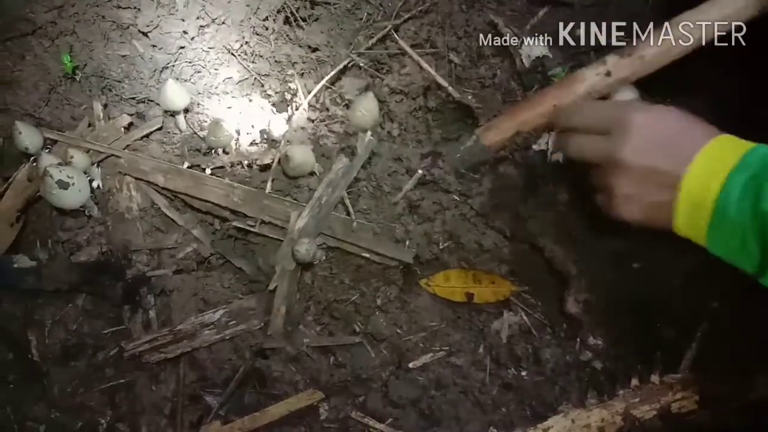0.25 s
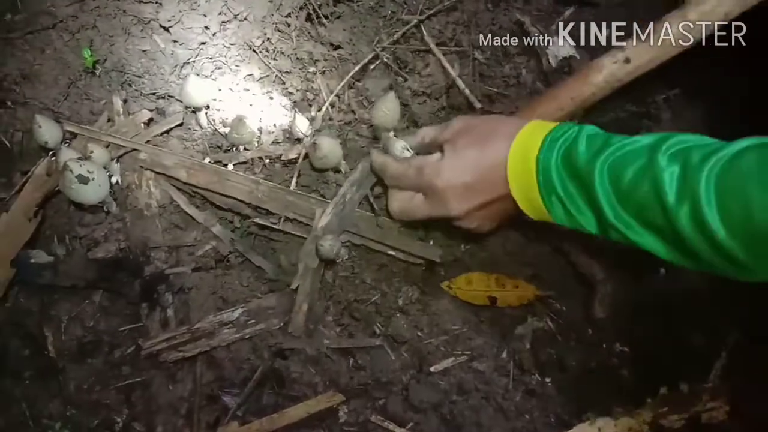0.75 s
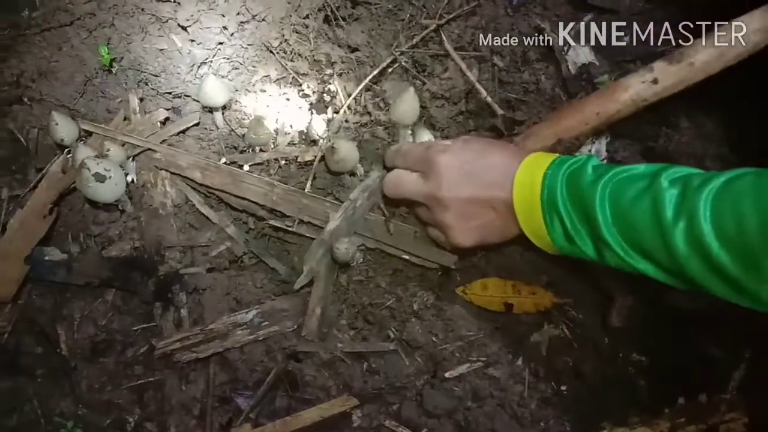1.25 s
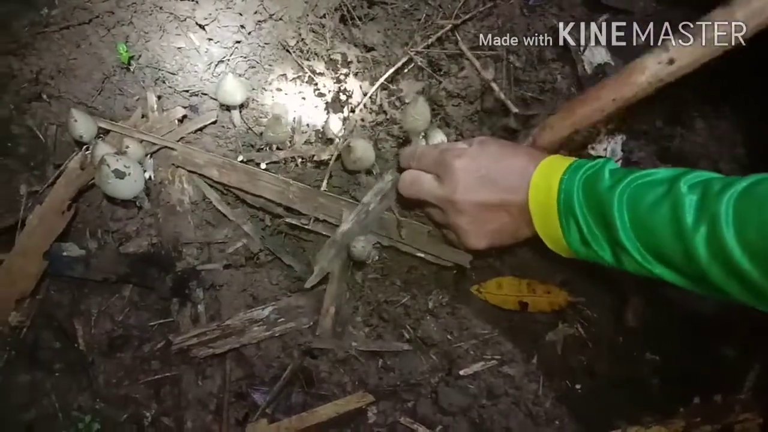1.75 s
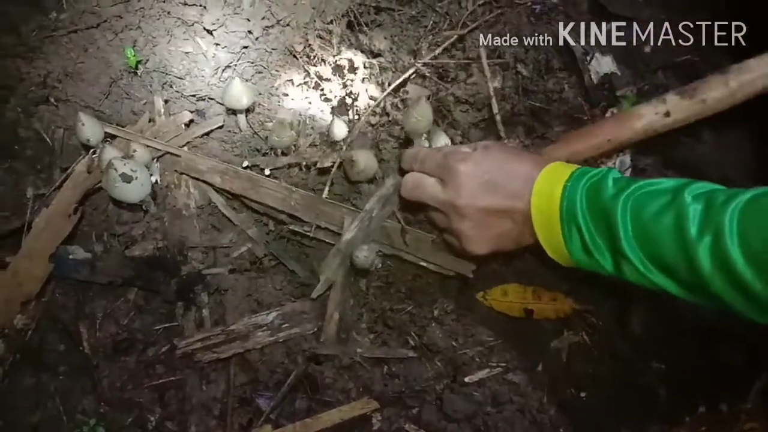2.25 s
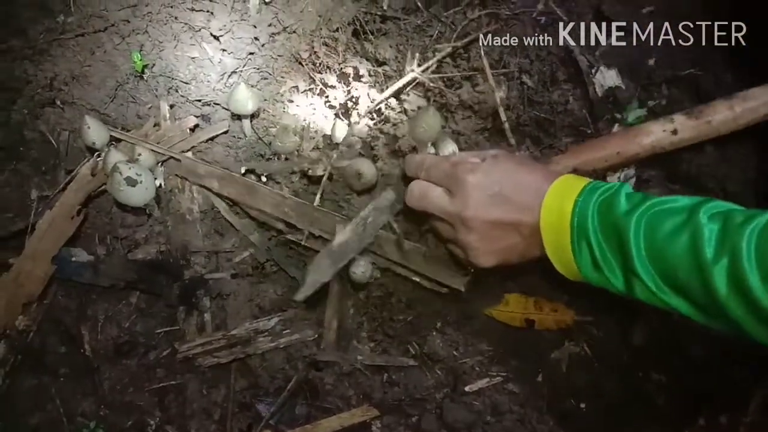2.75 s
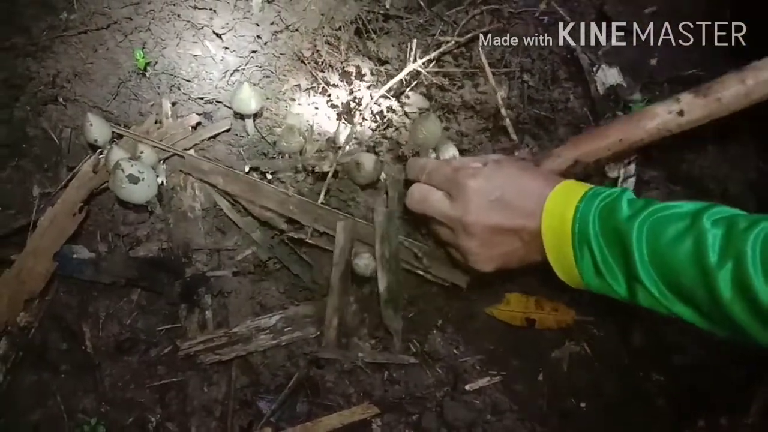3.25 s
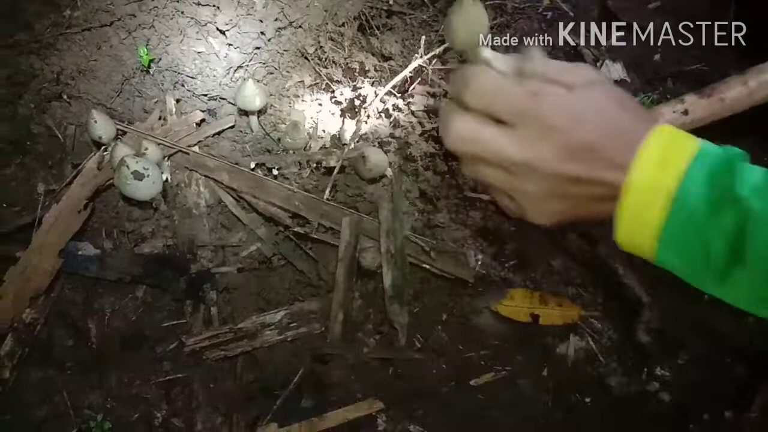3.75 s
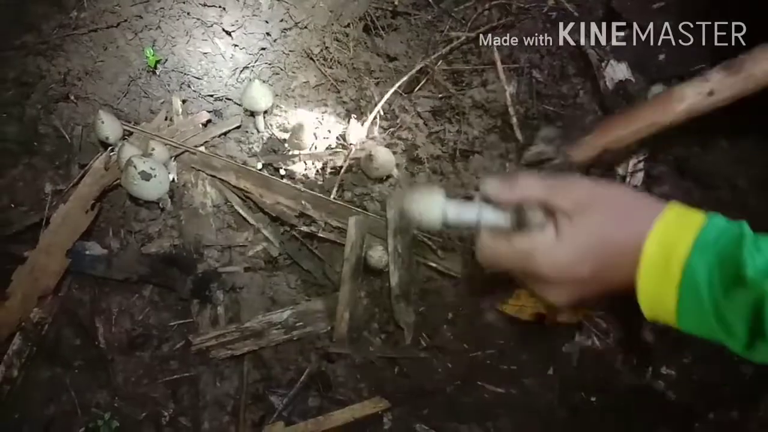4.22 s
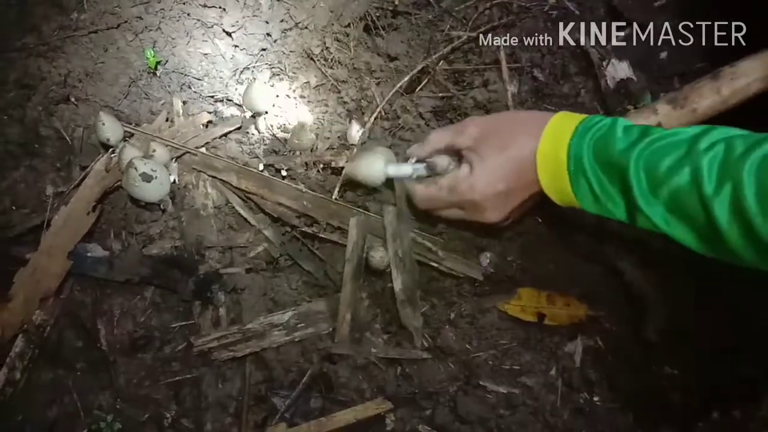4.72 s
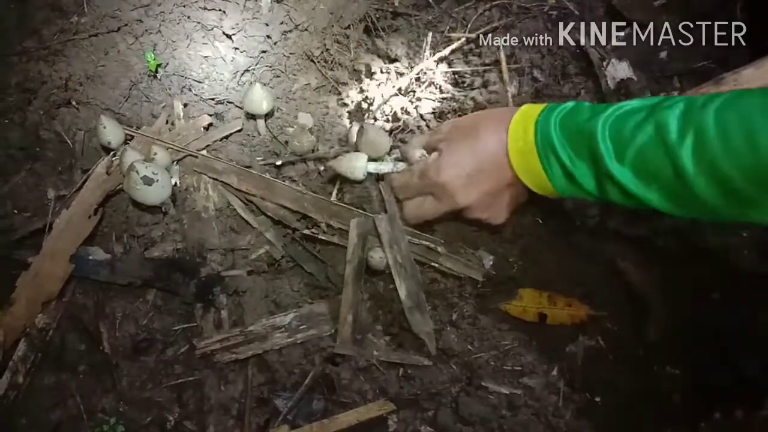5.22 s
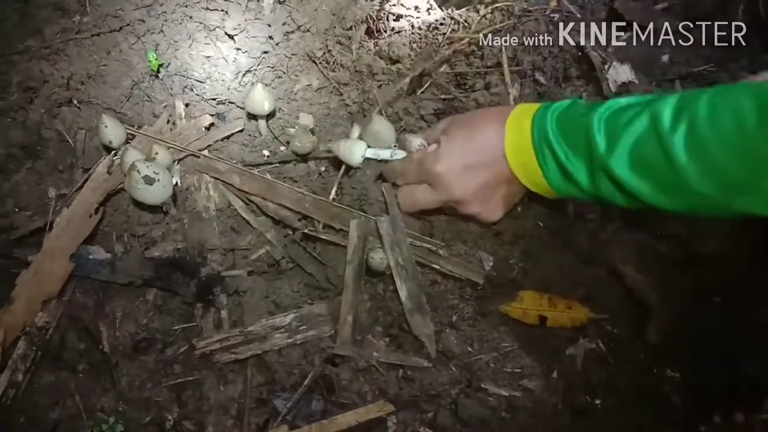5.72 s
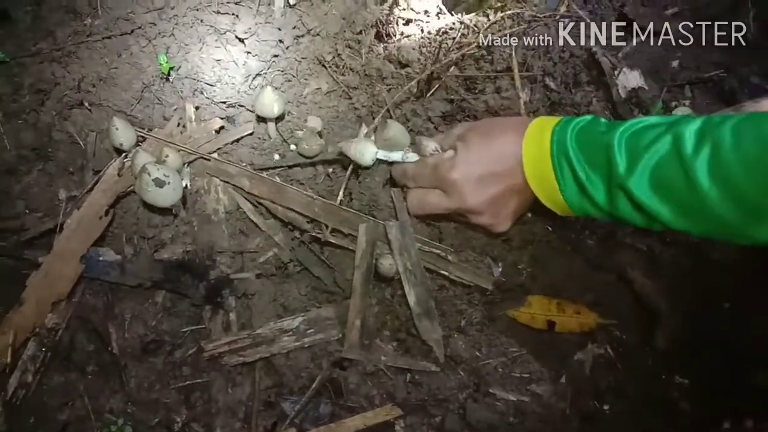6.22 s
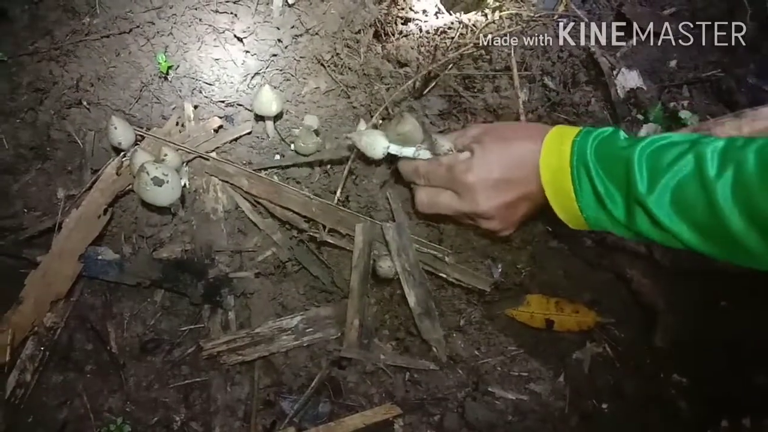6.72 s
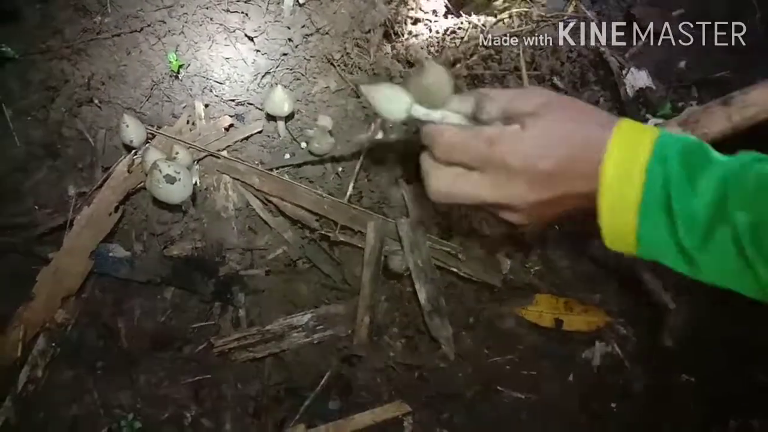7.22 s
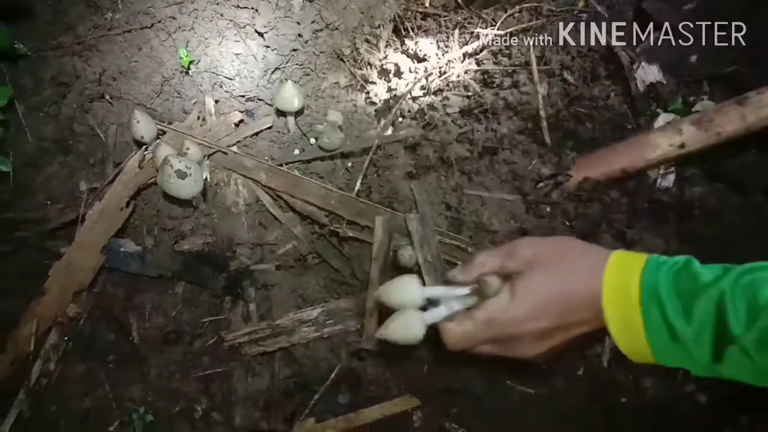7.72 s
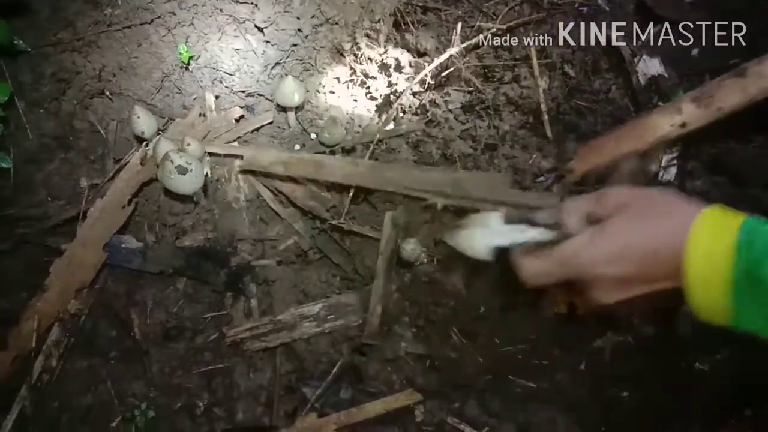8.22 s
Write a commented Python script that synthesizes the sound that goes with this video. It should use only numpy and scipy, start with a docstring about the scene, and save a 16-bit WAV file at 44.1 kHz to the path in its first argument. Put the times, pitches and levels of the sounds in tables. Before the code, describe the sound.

Sharp twig cracks and small woody clicks break over a steady, high-pitched chorus of crickets on a quiet forest floor at night.

```python
"""Crickets and a foraging hand

Night on a forest floor: crickets chirp and trill, near and far, while a hand picks mushrooms close by.
Each wing stroke is a short, falling tone that the trees smear into a chorus.
Twigs snap, sticks knock together and dry litter crackles: sharp pushes and tiny cracks set off resonances.
Filtered noise makes a faint low rumble and hiss underneath."""
import sys
import numpy as np
from scipy import signal
from scipy.fft import rfft, irfft, next_fast_len
from scipy.io import wavfile

SR = 44100
rng = np.random.default_rng(int(sys.argv[2]) if len(sys.argv) > 2 else 0)


def master(y):
    """Save y as 16-bit WAV."""
    cut = np.clip(np.atleast_2d(y).T, -1, 1)
    pcm = np.round(cut * 32767)  # scale
    wavfile.write(sys.argv[1], SR, pcm.astype(np.int16))


N = 373527
T = np.arange(N) / SR


def undb(db):
    """Turn decibels into gain."""
    return 10 ** (np.asarray(db) / 20)


def unit(x):
    """Scale to an rms of 1."""
    return x / np.sqrt(np.mean(x ** 2) + 1e-24)


def peak(x, db):
    """Scale so that the highest peak lies at db."""
    return x * undb(db) / np.abs(x).max()


def add(out, s, x):
    """Mix x into out from time s on."""
    i = max(int(s * SR), 0)
    x = x[:max(N - i, 0)]
    out[i:i + len(x)] += x


def ring(x, hz, width):
    """One resonance, with a gain of 1 at its centre."""
    centre = min(hz, .45 * SR)
    sharpness = hz / min(width, .4 * SR)
    b, a = signal.iirpeak(centre, sharpness, fs=SR)
    return signal.lfilter(b, a, x)


def band(x, hz, width):
    """The same resonance applied twice, for steeper sides."""
    return ring(ring(x, hz, width), hz, width)


def walk(rate):
    """Random drift with a spread near 1: straight lines between random points, rate of them a second."""
    knots = rng.standard_normal(int(N / SR * rate) + 2)
    return np.interp(T * rate, np.arange(len(knots)), knots)


def grains(per_s, spread_db):
    """A run of tiny cracks of uneven size at random times."""
    sizes = rng.standard_normal(N) * undb(spread_db * np.minimum(rng.exponential(size=N), 3))
    return (rng.random(N) < per_s / SR) * sizes


FOREST_T60_S = 0.86  # time the echo takes to fall by 60 dB; it is cut off after half a second


def forest(x, wet_db):
    """Direct sound plus a tail scattered by trunks and leaves, at about the same total power."""
    t = T[:SR // 2]
    tail = rng.standard_normal(len(t)) * np.exp(-np.log(1000) * t / FOREST_T60_S)
    # a mirrored piece goes in front, so the echo is already under way at time 0
    led_in = np.r_[x[:len(t)][::-1], x]
    echo = signal.fftconvolve(led_in, tail / np.linalg.norm(tail))[len(t):len(t) + N]
    return (x + undb(wet_db) * echo) / np.hypot(1, undb(wet_db))


def stroke(u):
    """Loudness along one wing stroke, u from 0 to 1: it rises and falls like half a sine."""
    return np.abs(np.sin(np.pi * np.clip(u, 0, 1)))


def chirp_times(bouts, pace_s):
    """Rows (time [s], level [dB]): chirps evenly spaced from the first to the last of each bout."""
    rows = []
    for first, last, db in bouts:
        count = round((last - first) / pace_s) + 1
        rows += [(s, db) for s in np.linspace(first, last, count)]
    return rows


def sing(bouts, pace_s):
    """Rows (time [s], level [dB]): no chirp is quite on time, or quite as loud as the one before."""
    even = np.array(chirp_times(bouts, pace_s))
    jitter_s, scatter_db = .0015, 1.23
    return even + rng.standard_normal(even.shape) * [jitter_s, scatter_db]


def chirps(table, hz, fall_hz, period_s, stroke_s, first_db, count, scatter=0.0043):
    """Groups of wing strokes; the scraper slows along the file, so each tone falls."""
    out = np.zeros(N)
    u = T[:int(stroke_s * SR)] / stroke_s
    for (s, db), chance in zip(table, rng.standard_normal((len(table), count, 3))):
        for k, (detune, size, phase) in enumerate(chance):
            pitch = hz * (1 + scatter * detune) + fall_hz * (.5 - u)
            tone = np.sin(2 * np.pi * (np.cumsum(pitch) / SR + phase))
            # first_db sets the opening stroke apart from the rest
            level_db = db + size + first_db * (k == 0)
            add(out, s + k * period_s, undb(level_db) * stroke(u) * tone)
    return out


def trill(hz, rate, fall_hz, duty, waver, slip):
    """An unbroken run of falling wing strokes, rms 1; each stroke has its own size and slips in phase."""
    strokes = np.cumsum(rate * (1 + .035 * walk(6))) / SR + rng.random()
    size, phase = rng.standard_normal((2048, 2))[strokes.astype(int) % 2048].T
    # the stroke fills the share "duty" of its turn, then the wing is silent
    u = strokes % 1 / np.clip(duty, .1, 1)
    pitch = hz * (1 + waver * walk(30)) + fall_hz * (.5 - np.minimum(u, 1))
    tone = np.sin(2 * np.pi * (np.cumsum(pitch) / SR + slip * phase))
    return unit(stroke(u) * undb(2.64 * size) * tone)


# bouts of the nearest cricket: (first chirp [s], last chirp [s], relative level [dB])
NEAR_BOUTS = [(.042, .503, -46.5), (.75, 1.472, -46), (1.753, 2.44, -47.5), (2.695, 3.157, -45),
              (3.405, 4.398, -47), (4.637, 7.067, -49)]


def near_cricket():
    """Short chirps of four falling strokes, with little echo because the cricket is close."""
    song = chirps(sing(NEAR_BOUTS, pace_s=.24), hz=4390, fall_hz=430,
                  period_s=.025, stroke_s=.017, first_db=-3, count=4)
    return undb(4.0) * forest(song, wet_db=-9)


# bouts of its neighbour: (first chirp [s], last chirp [s], relative level [dB])
NEIGHBOUR_BOUTS = [(.025, 1.015, -56.5), (1.252, 1.765, -52.5), (2.245, 2.758, -51.5),
                   (2.975, 4.657, -51.5), (5.125, 5.625, -51), (5.905, 6.652, -50.5), (6.885, 8.395, -54)]
NEIGHBOUR_PACE_S = .25  # usual time from chirp to chirp


def neighbour_cricket():
    """A second cricket, a little lower in pitch and with more echo, chirps in fives."""
    song = chirps(sing(NEIGHBOUR_BOUTS, NEIGHBOUR_PACE_S), hz=4230, fall_hz=323,
                  period_s=.024, stroke_s=0.01584, first_db=-5, count=5)
    return undb(4.5) * forest(song, wet_db=-7)


def followers(lag_s=0.041, spread_s=0.068):
    """More crickets of the same kind fall into step with the neighbour, a little behind it."""
    beat = np.zeros(N)
    for s, _ in chirp_times(NEIGHBOUR_BOUTS, NEIGHBOUR_PACE_S):
        beat += np.exp(-.5 * ((T - s - lag_s) / spread_s) ** 2)
    upper = undb(-53.0) * trill(hz=4175, rate=39, fall_hz=188.8, duty=.75, waver=0.00402, slip=0.52)
    lower = undb(-58.5) * trill(hz=4096, rate=37, fall_hz=398.5, duty=.7, waver=0.0065, slip=0.69)
    return forest((upper + lower) * beat, wet_db=-5.5)


# bouts of a cricket that joins in now and then, of a tiny high one and of a still higher one:
# (first chirp [s], last chirp [s], relative level [dB])
STRAY_BOUTS = [(1.14, 1.63, -67), (2.38, 3.45, -62.5)]
THIN_BOUTS = [(.14, .89, -65), (2.32, 3.09, -66.5), (4.41, 5.18, -66.5), (6.68, 7.45, -67)]
THINNER_BOUTS = [(.83, 1.1, -67), (1.4, 1.7, -74), (2.71, 3.19, -74.5), (3.51, 4.06, -70.5),
                 (4.9, 5.68, -70.5), (6.11, 6.43, -74), (6.8, 7.4, -70.5), (7.69, 8.24, -75.5)]
# single strokes of a tiny cricket that does not break into a chirp: (time [s], relative level [dB])
PIPS = [(3.602, -65), (3.945, -64), (4.274, -63), (4.661, -61), (5.08, -62), (6.645, -67)]


def small_crickets():
    """Thin, high chirps and single strokes, with as much echo as direct sound."""
    stray = chirps(sing(STRAY_BOUTS, pace_s=.26), hz=5350, fall_hz=240,
                   period_s=0.016, stroke_s=0.022, first_db=-10, count=5)
    thin = chirps(sing(THIN_BOUTS, pace_s=.38), hz=8150, fall_hz=100,
                  period_s=0.015, stroke_s=0.012, first_db=-0.5, count=7, scatter=.002)
    thinner = chirps(sing(THINNER_BOUTS, pace_s=.275), hz=8500, fall_hz=120,
                     period_s=0.015, stroke_s=0.01, first_db=3.0, count=7, scatter=0.0051)
    pips = chirps(PIPS, hz=8650, fall_hz=220,
                  period_s=0, stroke_s=0.0078, first_db=-1, count=1, scatter=.002)
    return undb(5.5) * forest(stray + thin + thinner + pips, wet_db=0.0)


# swells of a trill, about one a second: (start [s], relative level [dB])
SWELLS = [(-.17, -60), (.73, -57), (1.72, -56.5), (2.84, -59), (3.751, -59), (4.74, -59), (5.99, -58),
          (7.021, -57.5), (8.05, -55)]
SWELL_ATTACK_S, SWELL_HOLD_S, SWELL_RELEASE_S = 0.083, 0.23, 0.43
# each swell starts flat by this much and settles as the wings speed up
SWELL_HZ, SWELL_FLAT_HZ, SWELL_CLIMB_S = 5144, 153.8, .18


def swells():
    """Gain and pitch [Hz]: each swell rises, holds and dies away while its pitch climbs."""
    gain, age = np.zeros(N), T
    corners = np.cumsum([0, SWELL_ATTACK_S, SWELL_HOLD_S, SWELL_RELEASE_S])
    for start, db in SWELLS:
        gain = gain + undb(db) * np.interp(T - start, corners, [0, 1, 1, 0])
        age = np.where(T >= start, T - start, age)
    return gain, SWELL_HZ - SWELL_FLAT_HZ * np.exp(-age / SWELL_CLIMB_S)


# crickets that swell together:
# (pitch above the common one [Hz], strokes [per s], fall in a stroke [Hz], share [dB])
SWELL_VOICES = [(10.5, 52, 260, -2), (-55.5, 43, 420, -7.5), (50, 58, 300, -10.5)]


def swelling_trill():
    """A few trilling crickets share one swell of loudness and one climb of pitch."""
    gain, pitch = swells()
    voices = np.zeros(N)
    for above_hz, rate, fall_hz, db in SWELL_VOICES:
        voices += undb(db) * trill(pitch + above_hz, rate, fall_hz, duty=0.85, waver=.007, slip=0.46)
    return forest(gain * voices, wet_db=2.0)


# long even trills: (start [s], end [s], level [dB], pitch [Hz], strokes [per s])
LONG_TRILLS = [(1.06, 1.5, -76, 8570, 66), (1.45, 1.823, -76.5, 8560, 68), (1.22, 1.778, -64, 7020, 63),
               (2.325, 2.917, -72, 7580, 32), (2.68, 3.4, -64.5, 7010, 62), (3.29, 3.897, -69, 7580, 36),
               (4.08, 4.623, -66.5, 7020, 67), (4.353, 4.992, -67.5, 7580, 37),
               (5.466, 6.09, -67, 7580, 36)]


def high_trills():
    """High, steady runs of wing strokes that start and stop with 50 ms fades."""
    high = np.zeros(N)
    for start, end, db, hz, rate in LONG_TRILLS:
        gate = np.clip(np.minimum(T - start, end - T) / .05, 0, 1)
        high += undb(db) * gate * trill(hz, rate, fall_hz=120, duty=.9, waver=.0015, slip=.3)
    return forest(high, wet_db=-1.5)


def contact(tail_db, tail_s):
    """One sharp push followed by a brief crumbling of fibres."""
    t = T[:SR // 12]
    push = undb(tail_db) * rng.standard_normal(len(t)) * np.exp(-t / tail_s)
    push[0] += 1
    return push


# twigs snapping: (time [s], relative level of the crack [dB], relative level of the woody body [dB],
# pitch of the body [Hz], gain of the glint against the crack [dB])
SNAPS = [(0.0245, -31.5, -45.5, 3680, -8), (0.1426, -27.5, -35.5, 2480, -14), (0.187, -20, -27.5, 3720, -7),
         (.529, -36, -62, 3700, -24), (1.02, -26, -33, 3800, -5), (2.154, -36, -52, 2500, -21),
         (2.166, -28.5, -46, 3180, -19), (2.4893, -15, -28.5, 3870, -19), (2.499, -27, -41, 3500, -12),
         (2.5074, -10, -24, 3600, -9), (2.51, -16, -41, 3050, -10), (2.544, -28.5, -45, 3670, -10),
         (2.615, -24, -53, 4400, 3), (2.623, -24, -56, 3720, 7), (2.6475, -17, -37.5, 3900, -3.5),
         (2.75, -23, -42, 3640, -18), (2.989, -39, -57, 4700, -16), (3.0869, -38, -70, 3700, -21),
         (3.4377, -29.5, -44, 3880, -3), (4.0325, -51, -49.5, 3020, -20), (5.962, -42, -65, 3700, -16),
         (6.0597, -53, -51.5, 2970, -20), (7.365, -37.5, -42.5, 3250, -22), (7.646, -39, -54, 4500, -18),
         (7.669, -37, -50, 4520, -16), (7.6913, -46, -40, 4800, -24), (7.933, -33, -43, 3730, -10),
         (8.2723, -33.5, -52, 4200, -25)]


def twigs():
    """A breaking twig gives a bright crack, a glint above it, a short woody body and a dull nudge to the soil."""
    out = np.zeros(N)
    for s, crack_db, body_db, body_hz, glint_db in SNAPS:
        push = contact(tail_db=-16.5, tail_s=0.0022)
        crack = ring(band(push, 6330, 2200), 7760, 3000)
        glint = undb(glint_db) * band(push, 15100, 1440)
        body = band(push, body_hz, 0.44 * body_hz)
        nudge = undb(-23.0) * band(push, 540, 580)
        snap = peak(crack + glint, crack_db - .5) + peak(body + nudge, body_db + 8.5)
        add(out, s + 0.00078, snap)
    return forest(out, wet_db=-41.0)


DAMP_WOOD_HZ = 8360  # damp wood carries little above this
# the hand dragging through litter:
# (start [s], length [s], relative level [dB], centre pitch [Hz], spread [octaves])
DRAGS = [(0, 0.37, -77, 3080, 0.46), (0.692, 0.15, -72, 5400, 0.29), (0.849, 0.29, -79.5, 2800, 1.6),
         (1.785, 0.11, -80, 800, 1), (2.034, 0.096, -70, 2640, 1.2), (2.142, .12, -72.5, 4200, 1.8),
         (2.559, 0.12, -65, 5700, 0.9), (2.736, 0.1, -71, 2920, 0.9), (2.955, .07, -74.5, 4500, 1.6),
         (3.418, 0.081, -74, 2800, 1), (4.358, 0.14, -69.5, 5000, 0.88), (4.42, 0.057, -71.5, 2700, 0.63),
         (6.524, 0.13, -70.5, 2284, 1.02), (6.863, 0.12, -72, 2760, 1.02), (7.108, 0.23, -77.5, 3770, 1.46),
         (7.64, 0.04, -59, 5650, 0.59), (7.915, 0.074, -67, 3280, 1.3), (7.979, 0.07, -71, 5960, 1.1),
         (8.257, 0.1, -68, 4220, 1.6), (8.343, .14, -76, 2800, 1.7)]


def litter():
    """Dry leaves and soil give way in a gritty scrape; each size of fragment crackles in its own pitch range."""
    out = np.zeros(N)
    fragment_hz = np.geomspace(550, 7400, 12)
    # larger slips set off every size of fragment at once
    slips = grains(per_s=290, spread_db=0.0)
    beds = []
    for hz in fragment_hz:
        cracks = grains(per_s=1600, spread_db=4.0) + 2.5 * slips
        beds.append(unit(band(cracks, hz, 0.26 * hz)))
    beds = np.array(beds) * undb(4 * walk(70))
    for s, length_s, db, centre_hz, octaves in DRAGS:
        shares = np.exp(-.5 * (np.log2(fragment_hz / centre_hz) / octaves) ** 2)
        crackle = shares @ beds[:, max(int(s * SR), 0):int((s + length_s) * SR)]
        rise_and_fall = np.sqrt(stroke(np.linspace(0, 1, len(crackle))))
        add(out, s, undb(db + 12.0) * unit(crackle * rise_and_fall))
    return signal.sosfilt(signal.butter(4, DAMP_WOOD_HZ, fs=SR, output="sos"), out)


def small_knocks():
    """Rows like KNOCKS: splinters bump at random while the hand drags, louder in the louder drags."""
    bumps_per_s, over_db, scatter_db, scatter_octaves = 12, 19, 4, .77
    rows = []
    for (start, length_s, db, _, _), chance in zip(DRAGS, rng.random((len(DRAGS), 12, 4))):
        for when, luck, size, pitch in chance:
            if luck < bumps_per_s * length_s / len(chance):
                bump_db = db + over_db + scatter_db * (2 * size - 1)
                bump_hz = 1700 * 2 ** (scatter_octaves * (2 * pitch - 1))
                rows.append((start + when * length_s, bump_db, bump_hz, -22))
    return rows


# sticks of different sizes knocking:
# (time [s], relative level [dB], pitch [Hz], level of the crumbling against the push [dB])
KNOCKS = [(.129, -37, 2330, -35), (.142, -47, 2320, -34), (.257, -37, 2740, -19.5),
          (0.292, -37.5, 1760, -20), (0.327, -44, 2110, -22), (0.711, -51, 1390, -20),
          (0.865, -50.5, 1480, -24), (0.928, -30, 3280, -28), (1.034, -46.5, 1090, -18),
          (1.785, -47, 920, -17), (2.216, -49.5, 1210, -13), (2.247, -38, 1160, -25),
          (2.91, -48, 1800, -28), (3.21, -39.5, 1240, -16), (3.464, -45, 1450, -23),
          (4.151, -46.5, 1200, -18), (4.4484, -41, 2500, -21), (4.473, -42.5, 1450, -19),
          (5.863, -44.5, 2140, -13), (6.241, -38, 1190, -21.5), (6.539, -43, 1370, -24),
          (6.563, -42, 2710, -27), (6.57, -38, 2900, -28), (6.596, -31, 2470, -31), (6.6, -42.5, 1180, -18),
          (6.704, -42, 1280, -25), (7.363, -38, 1370, -26), (7.439, -19, 1393, -32.5),
          (8.109, -40, 2050, -21), (8.32, -40, 1440, -14), (8.433, -40, 2210, -14)]
# what a stick rings with: (multiple of its pitch, filter width as a share of that frequency, gain [dB])
STICK = [(.2, 0.58, -9), (.42, 0.44, -14), (.7, 0.26, -2), (1, 0.38, 4), (1.52, 0.11, -1.5),
         (2.38, 0.33, -1.5), (2.8, 0.13, -20), (4.35, 0.18, -8.5)]


def sticks():
    """A blow rings the modes of a stick; the smaller the stick, the higher they all lie."""
    out = np.zeros(N)
    for s, db, pitch_hz, crumble_db in KNOCKS + small_knocks():
        push = contact(tail_db=crumble_db, tail_s=0.011)
        wood = np.zeros(len(push))
        for k, (multiple, width, mode_db) in enumerate(STICK):
            mode_hz = multiple * pitch_hz
            # every other mode swings the opposite way
            wood += (-1) ** k * undb(mode_db) * band(push, mode_hz, width * mode_hz)
        add(out, s + 0.00022, peak(wood, db + 0.66))
    return signal.sosfilt(signal.butter(8, DAMP_WOOD_HZ, fs=SR, output="sos"), out)


# crumbs of soil that shift all the while: (pitch [Hz], relative level of each narrow range [dB])
CRUMBS = [(300, -88), (520, -82.5), (900, -84.5), (1400, -84), (1900, -88.5), (3400, -98)]


def crumbs():
    """Small bits of soil shift in fits and starts: tiny cracks ring in ranges that come and go separately."""
    table_hz, table_db = np.transpose(CRUMBS)
    ticks = grains(per_s=220, spread_db=2)
    bits = np.zeros(N)
    for hz in np.geomspace(300, 3400, 18):
        fitful = unit(band(ticks, hz, .15 * hz) * undb(5 * walk(14)))
        bits += fitful * undb(np.interp(hz, table_hz, table_db))
    return bits * undb(4.2 * walk(7))


# far callers that never quite pause, then the farthest, fainter still:
# (pitch [Hz], strokes [per s], fall in a stroke [Hz], level [dB], strength of the level's wander [dB])
CHORUS = [(4236, 43, 260, -58.5, 2), (4090, 52, 480, -60.5, 2), (3904, 49, 260, -69.5, 1.5),
          (6246, 61, 440, -70, 3.5), (6790, 31, 340, -63.5, 1.5), (6934, 35, 280, -67.5, 0),
          (7150, 65, 400, -71, 2.5), (6730, 80, 650, -69.5, -2), (5400, 55, 500, -76, -6)]
FARTHEST = [(3350, 33, 300, -78, 4), (2847, 30, 420, -80, 5), (2210, 19, 120, -77, 5),
            (2300, 37, 200, -78, 5)]


def far_chorus():
    """Distant trills come and go, fluttering quickly and fading slowly, heard mostly by way of the trees."""
    voices = np.zeros(N)
    for hz, rate, fall_hz, db, wander_db in CHORUS + FARTHEST:
        song = trill(hz, rate, fall_hz, duty=.75, waver=.011, slip=0.57)
        wander = undb(wander_db * (.7 * walk(14) + .8 * walk(4)))
        voices += undb(db) * unit(song * wander)
    return forest(voices, wet_db=2.0)


def air(spectrum, level_db):
    """Noise shaped into a low rumble and a faint hiss, whose level wanders a little."""
    hz, db = np.transpose(spectrum)
    size = next_fast_len(N)
    bin_hz = np.arange(size // 2 + 1) * SR / size
    colour = undb(np.interp(np.log(bin_hz + 1), np.log(hz), db))
    noise = irfft(rfft(rng.standard_normal(size)) * colour, size)[:N]
    return unit(noise) * undb(level_db + walk(9.3))


# still air of the forest, then the part that differs between left and right:
# (frequency [Hz], relative level in each Hz [dB])
AIR = [(25, -24), (48, -20.5), (62, -5), (72, 6.5), (86, -4.5), (170, -2.5), (330, -15), (700, -21.5),
       (1120, -20.5), (1260, -16.5), (1420, -21), (1850, -22.5), (3200, -19.5), (5800, -21), (7000, -21),
       (7900, -25.5), (9500, -33), (13000, -40.5), (15200, -29.5)]
AIR_SIDE = [(25, -15), (70, -7.5), (250, -4.5), (600, -5.5), (1300, -4), (3000, -9.5), (8000, -34.5),
            (15000, -11.5)]


def scene():
    """Everything reaches both channels alike; only the air differs slightly."""
    chirping = near_cricket() + neighbour_cricket() + followers() + small_crickets()
    trilling = swelling_trill() + high_trills() + far_chorus()
    hand = twigs() + sticks() + litter() + crumbs()
    mid = chirping + trilling + hand + air(AIR, level_db=-64.7)
    # added on the left, taken away on the right
    return mid + air(AIR_SIDE, level_db=-81.5) * np.array([[1], [-1]])


# the phone's body colours all it hears: (frequency [Hz], width [Hz], gain of the added ring [dB])
PHONE = [(1260, 70, 3)]
TOP_HZ = 15500  # little passes above this


def record(dry):
    """The phone adds its own resonance and cuts the top."""
    coloured = dry + sum(undb(db) * ring(dry, hz, width) for hz, width, db in PHONE)
    return signal.sosfilt(signal.ellip(8, .2, 70, TOP_HZ, fs=SR, output="sos"), coloured)


dry = scene()
out = record(dry)
master(out)
```